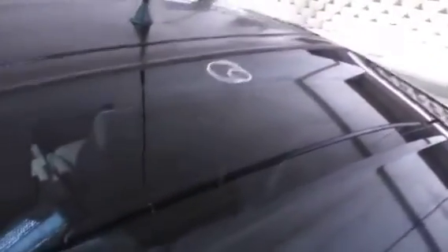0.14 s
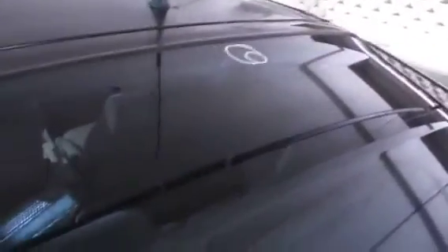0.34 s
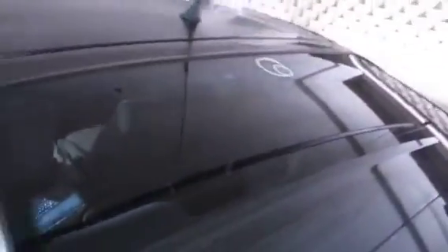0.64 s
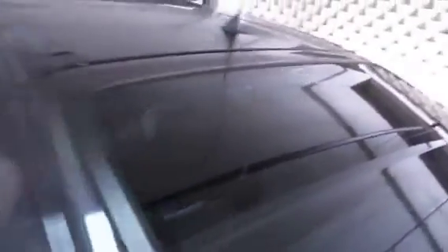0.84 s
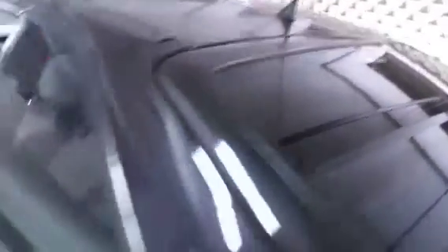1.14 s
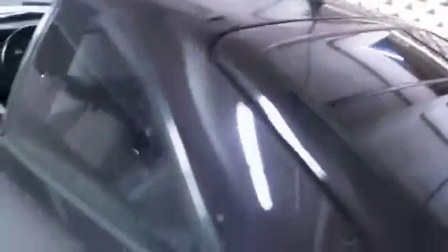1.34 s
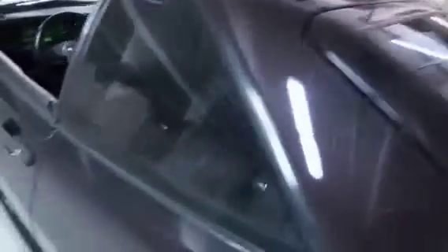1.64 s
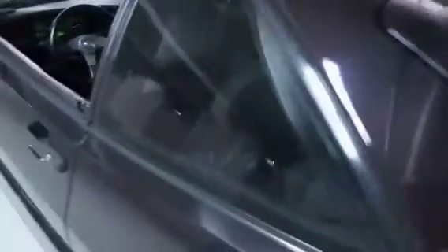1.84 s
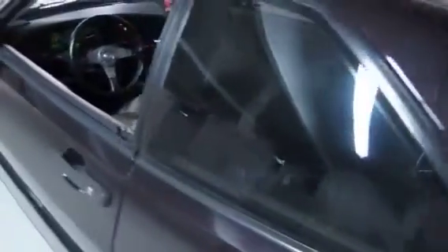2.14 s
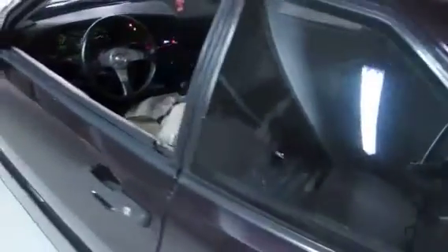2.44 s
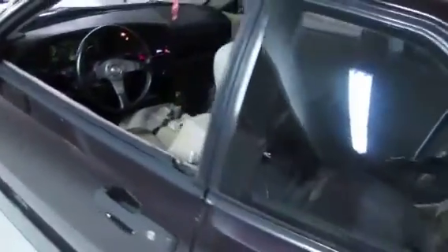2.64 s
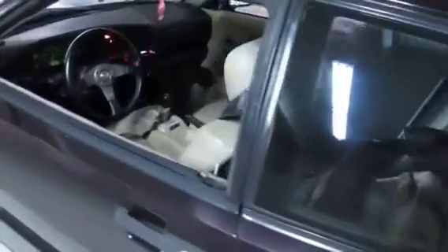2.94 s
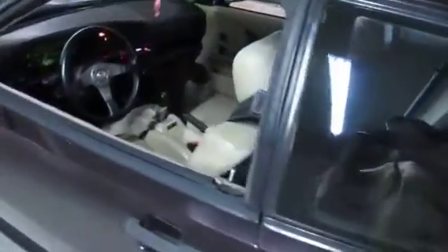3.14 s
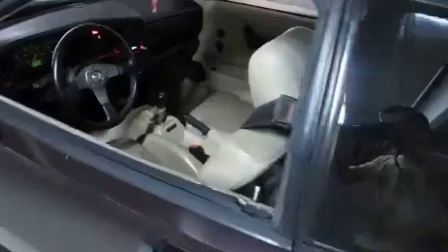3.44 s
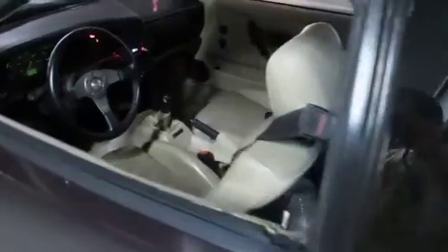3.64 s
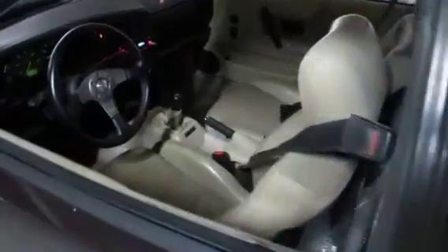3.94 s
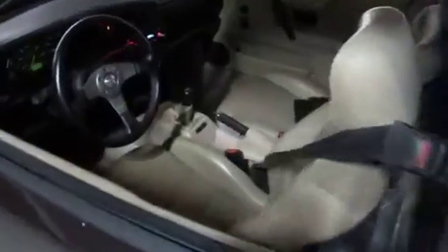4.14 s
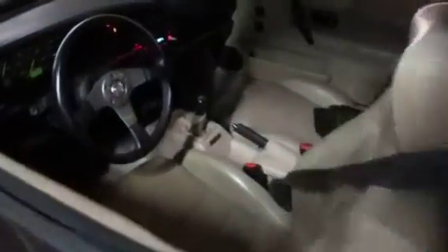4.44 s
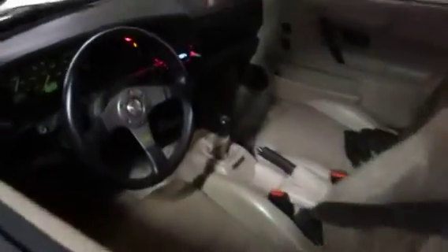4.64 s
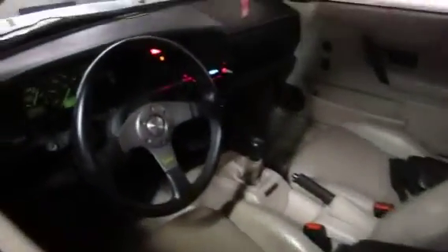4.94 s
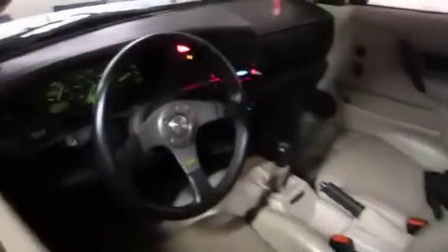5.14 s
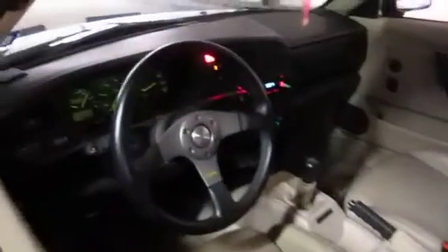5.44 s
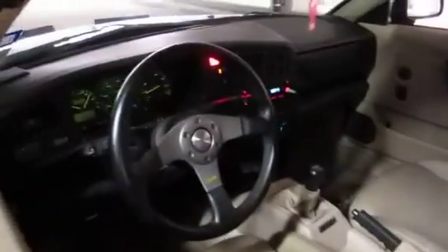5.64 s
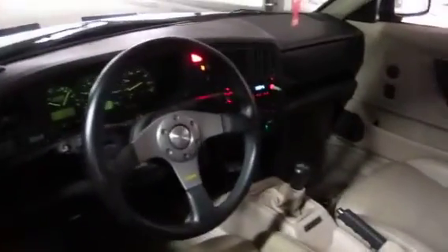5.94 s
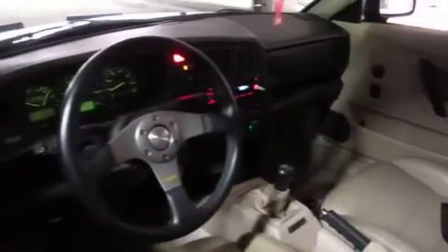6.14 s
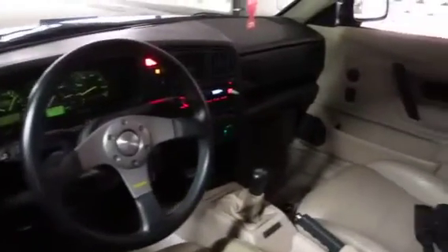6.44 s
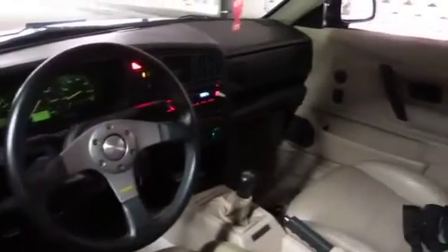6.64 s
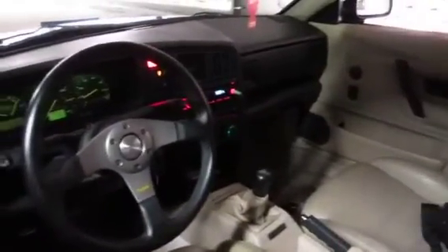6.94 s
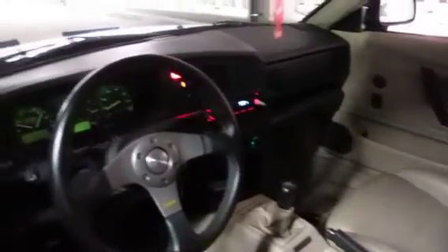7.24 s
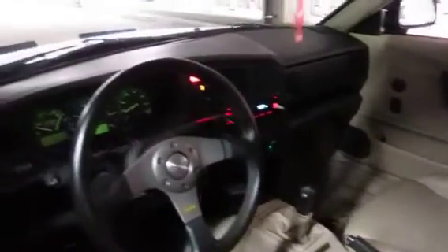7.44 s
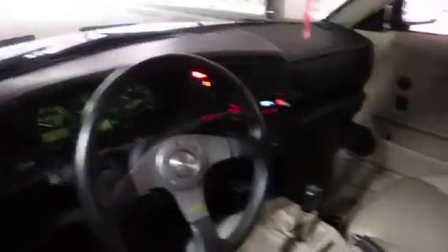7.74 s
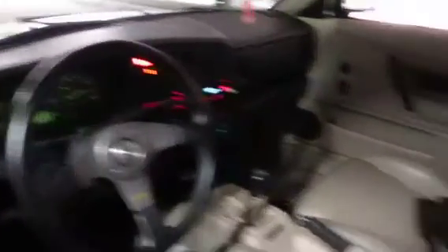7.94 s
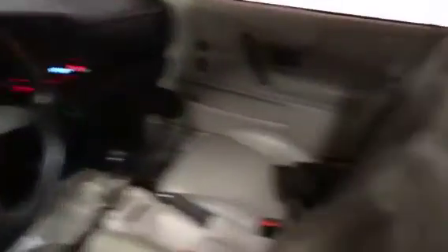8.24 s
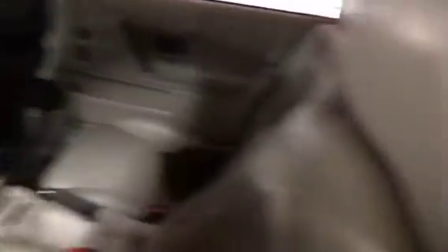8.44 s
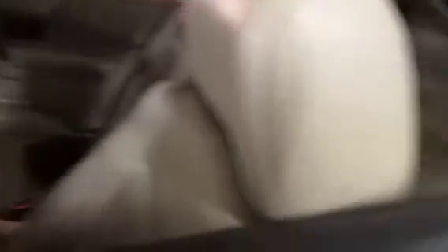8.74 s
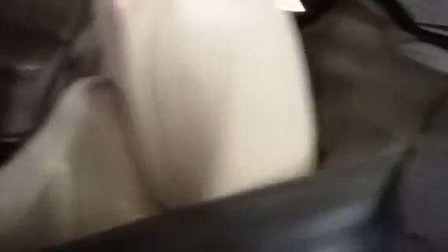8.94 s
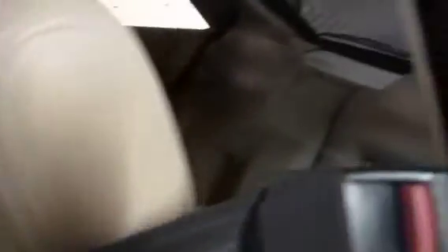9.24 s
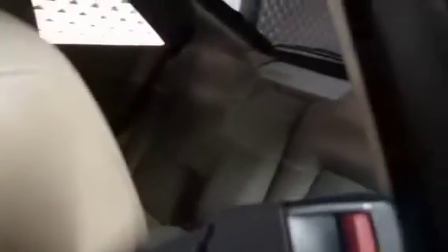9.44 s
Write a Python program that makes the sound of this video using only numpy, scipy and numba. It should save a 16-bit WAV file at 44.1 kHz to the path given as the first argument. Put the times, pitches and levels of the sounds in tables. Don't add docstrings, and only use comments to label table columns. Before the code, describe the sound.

Deep uneven idle of a six-cylinder car, bassy hum pulsing louder and softer as the listener moves around it, with soft hiss and small ticks.

```python
import sys
import numpy as np
from scipy import signal
from scipy.fft import rfft, irfft, next_fast_len
from scipy.io import wavfile
from scipy.ndimage import uniform_filter1d, minimum_filter1d
from numba import njit

SR = 44100
rng = np.random.default_rng(int(sys.argv[2]) if len(sys.argv) > 2 else 0)


def voltage_ratio(decibels):
    exponent = np.asarray(decibels, float) / 20
    return 10 ** exponent


def to_wav(s):
    ch = np.atleast_2d(s).T
    pcm = np.round(np.clip(ch, -1, 1) * 32767)
    wavfile.write(sys.argv[1], SR, pcm.astype(np.int16))


N = 422478

# t/s, firing rate f/Hz
IDLE_COURSE = [(0, 42.36), (.21, 41.4), (.74, 42.2), (.96, 43.66), (1.65, 43.27), (2.51, 41.27),
               (4.03, 41.7), (4.35, 43.1), (6.0, 41.7), (6.38, 40.6), (6.5, 39.06), (6.8, 41.7),
               (7.02, 42.8), (7.28, 41.65), (8.3, 43.66), (8.88, 43.73), (9.34, 41.67), (9.58, 41.36)]
# strength level/dB, lateness/firing periods
CYLINDERS = [(2, 0.014), (-1.5, 0.011), (0.5, -0.016), (-4, 0.041), (4, -.02), (0, -0.018)]
# multiple of firing rate/1, level/dB
UPPER_HARMONICS = [(3.5, -52.5), (5, -50), (6, -52.5), (7, -57.5), (8, -57)]
# t/s, level change/dB, width/s
NODES_2 = [(.14, -9.5, 0.081), (.27, -9.5, .022), (.71, 3.5, .11), (.96, -5, 0.027), (1.21, -3, 0.055),
           (1.52, -1.7, 0.14), (2.13, 3, .085), (2.48, -6, 0.071), (2.62, 3, .04), (2.81, -8, 0.015),
           (2.86, -8, 0.062), (3.18, -4, 0.039), (3.59, 3.5, 0.02), (3.68, -8, 0.023), (3.8, -7.5, 0.18),
           (3.96, -9, 0.014), (4.21, 5.5, 0.095), (4.46, -2, .05), (4.62, 2.5, .05), (5.91, -11, .084),
           (6.475, -17, 0.024), (6.63, -3, 0.066), (7.07, 3.5, 0.072), (7.36, -11, 0.1), (7.62, 3, 0.046),
           (8.19, -4, 0.082), (8.93, 0.5, 0.049), (9.45, -11, .11)]
# t/s, level change/dB, width/s
NODES_3 = [(.16, -12, 0.054), (.85, -4.5, 0.027), (1.48, 3, 0.57), (1.96, -10, 0.055), (2.39, -16.5, 0.23),
           (2.44, 14, 0.058), (2.67, -11, 0.035), (4.07, 3.5, 0.095), (4.41, -8.5, 0.053), (5.1, -4.5, .19),
           (6.18, 4, .37), (6.47, -6, 0.023), (6.6, -6, 0.037), (7.18, -12, 0.041), (7.49, 3, 0.038),
           (7.81, -2.5, .047), (8.7, -0.5, 0.13), (9.22, -14, 0.031), (9.38, 3.5, 0.12)]
# t/s, level change/dB, width/s
NODES_4 = [(0.17, -9, 0.149), (1.11, -5, 0.092), (2.25, -2.5, 0.45), (3.54, 4.5, 0.105), (5.42, -13, 0.16),
           (6.05, -11, 0.17), (7.26, -9, 0.068), (8.37, -9.5, 0.34), (9.02, 3.5, 0.087)]
# t/s, level change/dB, width/s
NODES_UPPER = [(.2, 1.5, 0.21), (1.1, 4.5, .12), (1.5, -0.5, 0.17), (2.9, -1, 0.79), (5.4, -3.5, .4),
               (6.2, 2.5, .15), (7.5, -3.5, .4), (8.6, 4, 0.28), (9.5, 2.5, .1)]
# t/s, half-order level change/dB, width/s
UNEVEN_BANKS = [(0.43, 0.5, 0.45), (1.5, -6, 0.346), (2.7, 8.5, 0.4), (3.4, -6, 0.064), (3.86, 10.5, 0.42),
                (4.38, -9.5, 0.077), (5.32, 2, 0.06), (6.15, -9, 0.099), (6.73, 5, 0.15),
                (7.54, 8.5, 0.079), (8.41, -11.5, 0.67), (9.57, 12, 0.08)]
# t/s, depth/dB, width/s, lag/engine cycles
THROB_2 = [
    (.6, 2, 0.21, 0.18),
    (1.4, 1.4, 0.37, .25),
    (2.8, 1, .2, 0.19),
]
# t/s, depth/dB, width/s, lag/engine cycles
THROB_3 = [(.7, 1.4, .25, .27), (1.9, 1.2, .25, 0.063), (4.6, 2, .25, -.34), (6.35, 2.8, .3, 0.061),
           (7.0, 2, .2, -0.013), (8.45, 1.6, .45, -.22)]
# t/s, rocking level change/dB, width/s
JOLTS = [
    (1.01, 10, .05),
    (4.13, 7, .05),
    (4.59, 8, .05),
    (6.69, 12, .09),
    (7.07, 4, 0.051),
    (7.6, 5, 0.45),
    (8.7, -4, 0.28),
    (9.42, 7, .07),
]
# f/Hz, width/Hz, level/dB
GARAGE_MODE_LIFT = (206, 4.8, 5)
# f/Hz, level/dB
HISS_COLOUR = [(500, -9), (850, -1.2), (1200, -0.5), (1600, -4.5), (2050, -1.5), (2700, -9), (3100, -12),
               (4200, -15.5), (5200, -14.5), (6500, -16.5), (6700, -20), (8700, -22.5), (11000, -33.5),
               (15500, -51)]
# f/Hz, level/dB
RUMBLE_COLOUR = [(18, -19.5), (29, -1), (36, -5), (65, 1.5), (105, 10), (142, -14), (160, -6.5), (200, -6),
                 (300, -12), (560, -16), (800, -20.5), (1100, -44)]
# t/s, level/dB
WASH = [(0, 0.5), (.4, 1), (1.2, 1), (2.4, 1.1), (3.5, -1), (4.3, 0.5), (5, 2.5), (5.9, 2), (6.5, 3),
        (7.2, 2.5), (8.2, 2), (8.6, 4), (9.58, 2)]
# t/s, level change/dB, width/s
THUMPS = [
    (4.16, 4.5, 0.015),
    (6.62, 1, 0.084),
    (8.79, 1, 0.014),
    (8.89, 1.5, .025),
]
# f/Hz, width/Hz, level/dB
GARAGE_MODES = [(206, 3.1, -51), (247.7, 6.8, -53), (303.3, 5.6, -53), (424.6, 8.3, -57.5), (552, 9.4, -57),
                (665, 17, -56.5)]
# f/Hz, level/dB
LAMP_HUM = [(359, -56), (478, -58.5), (719, -63)]
# t/s, lasting drop/dB, fall/s, passing duck/dB
DUCKS = [(.03, 0.3, 0.044, 1), (.74, 3.2, 0.036, 0.5), (.8, 2.5, .45, -0.3), (3.11, 0.97, 0.44, 0),
         (4.14, 3.5, .16, 4), (4.56, 3.5, 0.43, -0.2), (6.2, 1, 0.083, -0.2), (6.75, 1, .25, 0.3),
         (7.0, 3.5, 0.09, .5), (7.5, 2, .75, 1), (8.93, 1, 0.18, 1.2)]
# t/s, peak level/dB
CRACKLES = [(0.701, -47.5), (1.359, -55), (4.2645, -42.5), (4.2887, -41), (4.380, -40), (4.445, -40.5),
            (4.5086, -47.5), (4.5298, -44.5), (4.5596, -39.5), (5.5351, -53), (5.6682, -46),
            (5.9166, -47.5)]
# t/s, peak level/dB, ring f/Hz, ring t60/s, crack over ring level/dB
TICKS = [
    (.732, -35, 2000, 0.027, -5),
    (4.158, -23, 370, 0.039, -16),
    (4.321, -37, 2240, 0.013, -5),
    (4.8657, -36.5, 700, .03, 4),
    (5.839, -37, 1755, 0.051, -5),
    (6.153, -33, 936, 0.1, -13),
    (6.154, -41, 3270, .045, 0),
    (7.975, -45, 2026, 0.029, -3),
]
# t/s, length/s, f/Hz, level/dB
PANEL_BUZZ = [
    (1.2, .09, 1320, -51),
    (6.382, 0.11, 1190, -46),
    (6.495, .095, 1182, -44),
    (6.6, .075, 1192, -47),
    (6.675, 0.037, 1188, -46),
    (6.797, 0.051, 1185, -45),
]

RUN_IN_SAMPLES = SR // 4
SCATTER_DB, JITTER_PERIODS, HUNT_HZ = 1.27, 0.013, 0.2484
SECOND_DB, THIRD_DB, FOURTH_DB, HALF_ORDER_DB = -12, -23, -37, -33.5
SHAKE_DB, SHAKE_DB_PER_WASH_DB = -46, 2.5
HISS_DB, RUMBLE_DB = -51.5, -44
RECOVER_DB_PER_S, BOUNCE_S = 2.5, 0.2
TICK_ECHO_T60_S, TICK_ECHO_DB = 0.14, -9
LIMIT_PEAK = 0.7


def curves(table):
    s, *columns = np.transpose(table)
    return [np.interp(np.arange(N) / SR, s, column) for column in columns]


def spells(table):
    t_s = np.arange(N) / SR
    return sum(db * np.exp(-0.5 * ((t_s - s) / max(width_s, 0.01)) ** 2) for s, db, width_s in table)


def throb(table):
    cycle = np.cumsum(curves(IDLE_COURSE)[0]) / SR / len(CYLINDERS)
    return sum(spells([(s, db, width_s)]) * np.cos(2 * np.pi * (cycle - lag))
               for s, db, width_s, lag in table)


def unit(x):
    return x / np.sqrt(np.mean(x ** 2))


@njit
def svf(x, hz, width_hz):
    y, band, low = np.empty(len(x)), 0., 0.
    for i in range(len(x)):
        g = np.tan(np.pi * hz[i] / SR)
        k = width_hz / hz[i]
        v = (band + g * (x[i] - low)) / (1 + g * (g + k))
        band = 2 * v - band
        low = low + 2 * g * v
        y[i] = k * v
    return y


def resonate(x, hz, width_hz):
    return svf(x, np.full(len(x), float(hz)), float(width_hz))


def walk(rate_hz):
    hold = int(SR / rate_hz)
    steps = np.repeat(rng.standard_normal(N // hold + 1), hold)
    return 1.27 * uniform_filter1d(uniform_filter1d(steps, hold), hold)[:N]


def noise(colour, lo_hz, hi_hz, flicker_db):
    size = next_fast_len(N)
    hz = np.maximum(np.arange(size // 2 + 1) * SR / size, 1)
    point_hz, point_db = np.transpose(colour)
    colour_db = np.interp(np.log(hz), np.log(point_hz), point_db, right=-90)
    bins = rfft(rng.standard_normal(size)) * voltage_ratio(colour_db)
    inside = (hz > lo_hz) & (hz < hi_hz)
    bins = bins * size / np.sqrt(2 * np.sum(np.abs(bins[inside]) ** 2))
    octave = np.log2(hz / point_hz[0])
    out = np.zeros(N)
    for k in range(7):
        share = np.clip(1 - abs(octave - k), 0, 1)
        out += voltage_ratio(flicker_db * walk(4.5)) * irfft(bins * share, size)[:N]
    return out


def firings(firing_hz):
    turns = np.cumsum(firing_hz) / SR
    count = np.arange(1, int(turns[-1]))
    strength_db, late = np.array(CYLINDERS)[count % 6].T
    jitter, scatter = rng.standard_normal((2, len(count)))
    due = count + late + JITTER_PERIODS * jitter
    at = np.interp(due, turns, np.arange(len(turns))).astype(int)
    pulses = np.full(len(turns), 1e-18)
    pulses[at] = voltage_ratio(strength_db + SCATTER_DB * scatter)
    return pulses


def exhaust(gain_db, wash_db):
    firing_hz = uniform_filter1d(curves(IDLE_COURSE)[0], int(0.08 * SR)) + HUNT_HZ * walk(4)
    firing_hz = np.pad(firing_hz, (RUN_IN_SAMPLES, 0), "edge")
    pulses = firings(firing_hz)

    def order(multiple, width_hz, late_s=0.01035):
        hz = multiple * firing_hz
        line = svf(svf(svf(pulses, hz, width_hz), hz, width_hz), hz, 2 * width_hz)
        path_s = late_s + 0.0015 * walk(1.188)
        heard = RUN_IN_SAMPLES + np.arange(N) - SR * path_s
        return unit(np.interp(heard, np.arange(len(line)), line))

    second_db = SECOND_DB + spells(NODES_2) + throb(THROB_2)
    third_db = THIRD_DB + spells(NODES_3) + throb(THROB_3)
    shake_db = SHAKE_DB + SHAKE_DB_PER_WASH_DB * wash_db + spells(JOLTS)
    sound = voltage_ratio(second_db) * order(2, 12.6)
    sound += voltage_ratio(third_db) * order(3, 15.2, late_s=0.07)
    sound += voltage_ratio(HALF_ORDER_DB + spells(UNEVEN_BANKS)) * order(2.5, 12.3)
    sound += voltage_ratio(FOURTH_DB + spells(NODES_4)) * order(4, 5.0)
    sound += voltage_ratio(shake_db) * order(0.85, 11.0)
    shared_db = gain_db + spells(NODES_UPPER)
    upper = sum(voltage_ratio(db + shared_db + 1.5 * walk(2.5)) * order(k, 6.0) for k, db in UPPER_HARMONICS)
    mode_hz, width_hz, lift_db = GARAGE_MODE_LIFT
    return sound + upper + voltage_ratio(lift_db) * resonate(upper, mode_hz, width_hz)


def engine_bay(gain_db, wash_db):
    hiss = voltage_ratio(HISS_DB + gain_db) * noise(HISS_COLOUR, 2500, 9000, flicker_db=0.8)
    rumble_db = RUMBLE_DB + gain_db + wash_db + spells(THUMPS)
    return hiss + voltage_ratio(rumble_db) * noise(RUMBLE_COLOUR, 230, 800, flicker_db=0.86)


def garage(gain_db):
    t_s = np.arange(N) / SR
    out = np.zeros(N)
    for hz, width_hz, db in GARAGE_MODES:
        out += voltage_ratio(db) * unit(resonate(rng.standard_normal(N), hz, width_hz))
    for hz, db in LAMP_HUM:
        out += voltage_ratio(db + 1.6 * walk(0.88)) * np.sqrt(2) * np.sin(2 * np.pi * hz * t_s)
    return voltage_ratio(gain_db) * out


def gain_control():
    t_s = np.arange(N) / SR
    db = RECOVER_DB_PER_S * t_s
    for s, drop_db, fall_s, duck_db in DUCKS:
        back = np.exp(-np.maximum(t_s - s - fall_s, 0) / BOUNCE_S)
        fallen = np.clip((t_s - s) / max(fall_s, 0.01), 0, 1)
        db = db - fallen * (drop_db + duck_db * back)
    return db


def crackle():
    out = np.zeros(N)
    s, db = np.transpose(CRACKLES)
    out[(s * SR).astype(int)] = voltage_ratio(db)
    return signal.sosfilt(signal.butter(2, 5000, "high", fs=SR, output="sos"), out)


def ticks():
    out, t_s = np.zeros(N), np.arange(SR // 5) / SR
    dull = signal.butter(3, 3000, fs=SR, output="sos")
    for s, db, hz, t60_s, crack_db in TICKS:
        ring = np.sin(2 * np.pi * hz * t_s) * voltage_ratio(-60 * t_s / t60_s) * (1 - np.exp(-t_s / 0.00046))
        tail = voltage_ratio(-60 * t_s / 0.006) + voltage_ratio(TICK_ECHO_DB - 60 * t_s / TICK_ECHO_T60_S)
        blow = 2.5 * rng.standard_normal(len(t_s)) * tail - 9 * np.exp(-t_s / 0.00012)
        crack = signal.sosfilt(dull, resonate(blow, 1200, 3000))
        i = int(s * SR)
        out[i:i + len(t_s)] += voltage_ratio(db) * (ring + voltage_ratio(crack_db) * crack)
    return out


def panel():
    out, t_s = np.zeros(N), np.arange(N) / SR
    for s, length_s, hz, db in PANEL_BUZZ:
        swell = np.clip(np.minimum(t_s - s, s + length_s - t_s) / 0.017, 0, 1)
        tone = np.sin(2 * np.pi * hz * t_s + 0.25 * walk(30))
        out += voltage_ratio(db) * swell * np.sqrt(2) * tone
    return out * voltage_ratio(1.6 * walk(30))


def scene():
    pump_db = gain_control()
    gain_db = pump_db - pump_db.mean()
    wash_db = curves(WASH)[0]
    car = exhaust(gain_db, wash_db) + engine_bay(gain_db, wash_db)
    return (car + garage(gain_db) + ticks() + panel())[None]


def low_pass(x):
    return signal.sosfilt(signal.butter(12, 15300, fs=SR, output="sos"), x)


def record(dry):
    peak = -minimum_filter1d(-abs(dry), size=2000)
    held = dry * uniform_filter1d(np.minimum(1, LIMIT_PEAK / peak), size=1000)
    edge_s = np.minimum(np.arange(N), np.arange(N)[::-1]) / SR
    held = held * np.clip(0.6 + edge_s / 0.006, 0, 1)
    return low_pass(held + crackle())


dry = scene()
out = record(dry)
to_wav(out)
```